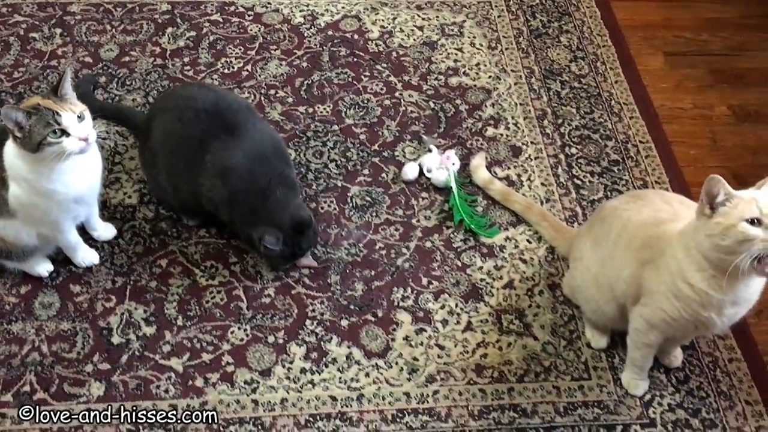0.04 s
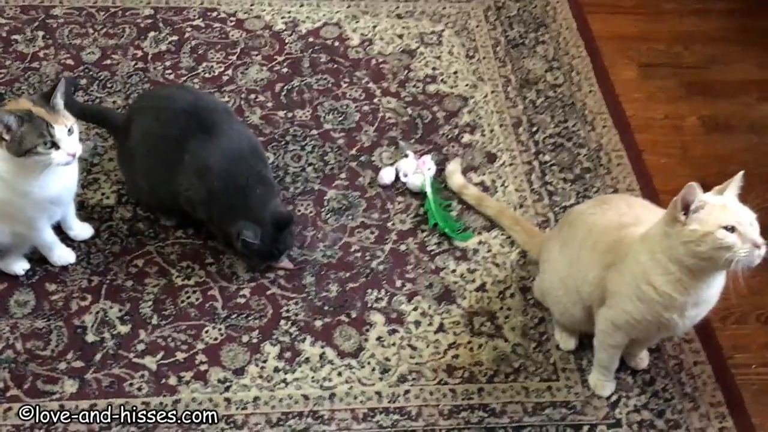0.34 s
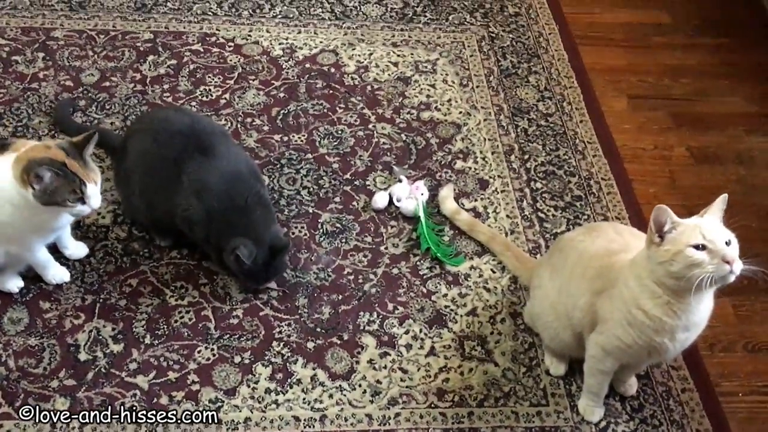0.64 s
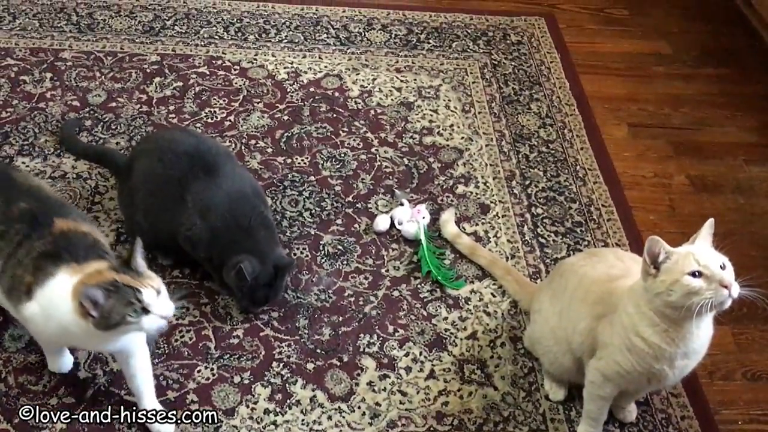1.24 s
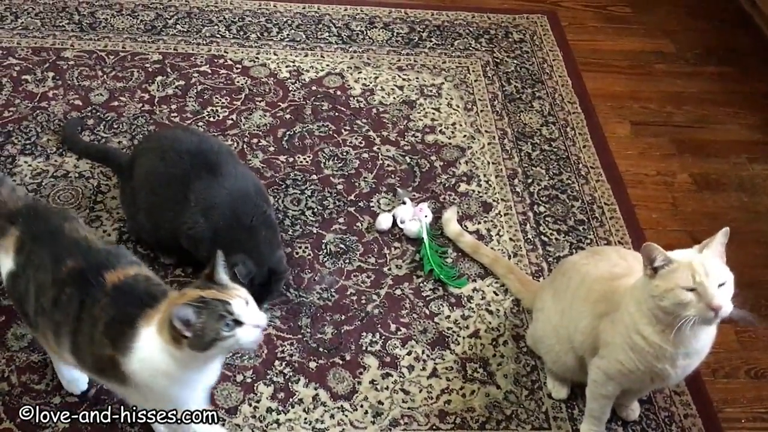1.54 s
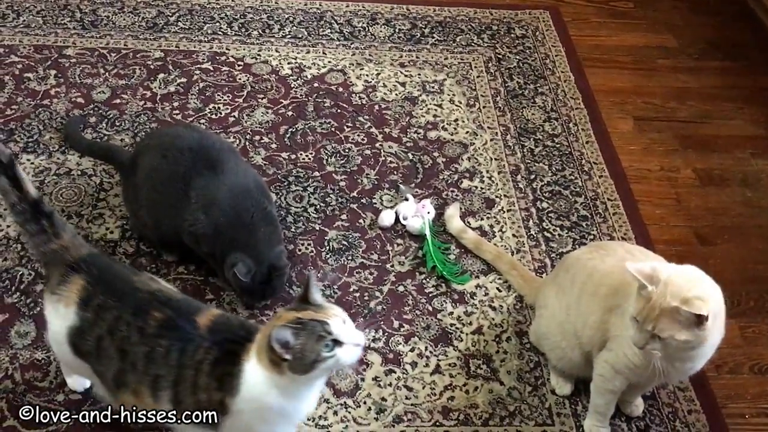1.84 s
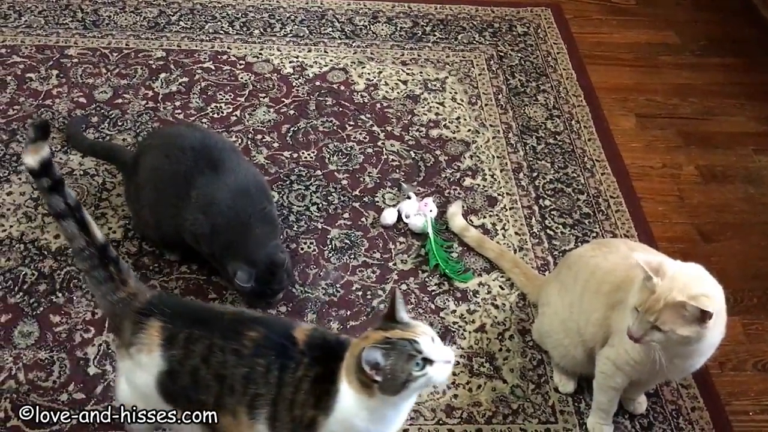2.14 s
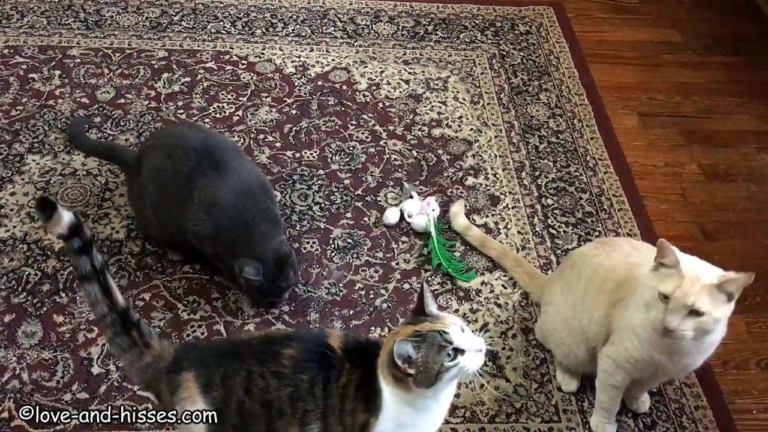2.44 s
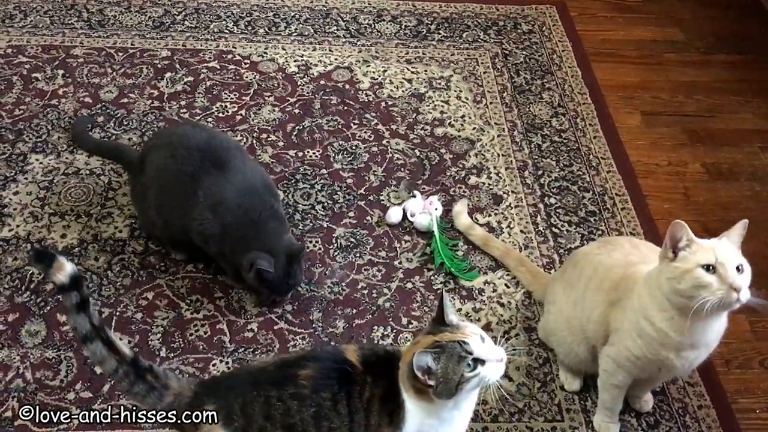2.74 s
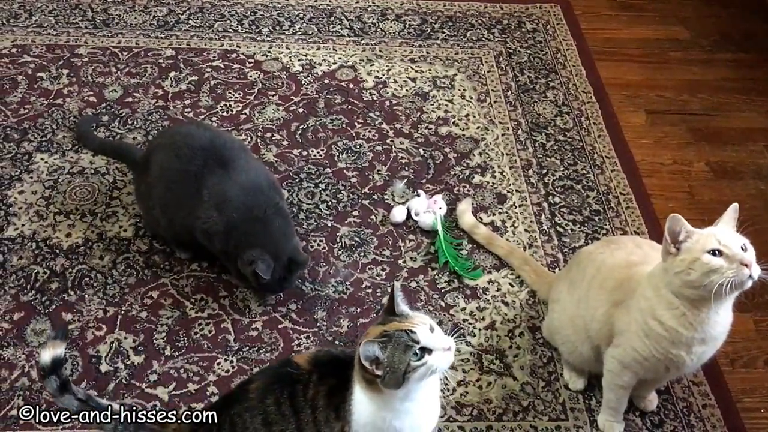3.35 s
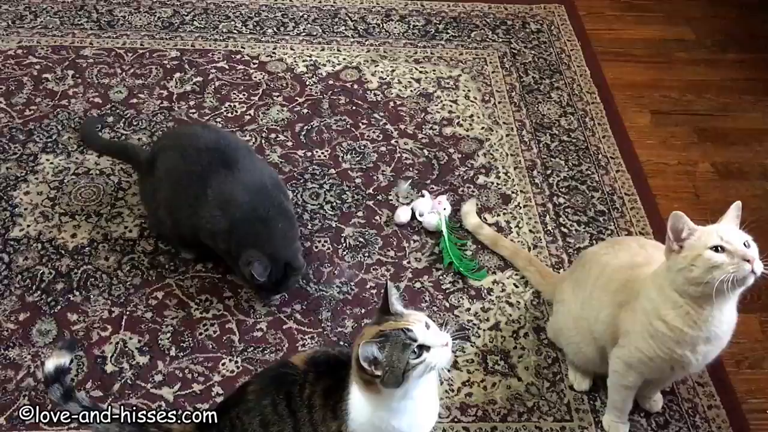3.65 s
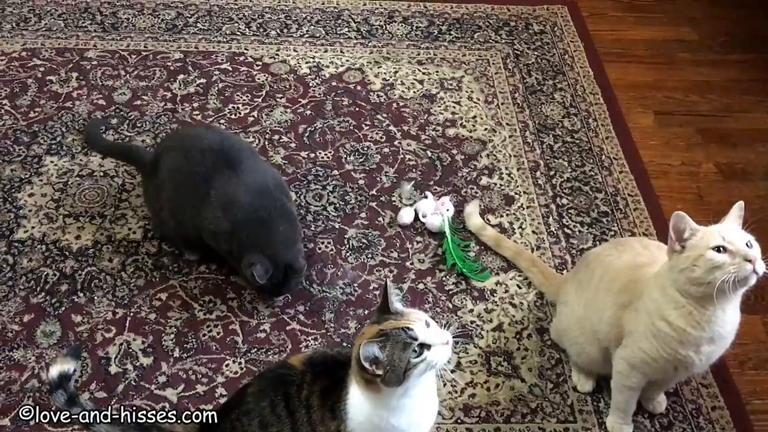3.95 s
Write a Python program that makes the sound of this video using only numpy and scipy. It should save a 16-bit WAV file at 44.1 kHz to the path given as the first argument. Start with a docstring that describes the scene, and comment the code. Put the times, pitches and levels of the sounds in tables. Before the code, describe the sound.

A cat gives two short, thin mews amid soft thumps and clicks in a quiet room.

```python
"""Low rumble, faint hiss and an appliance's hum fill a quiet living room throughout. Soft rustles
come and go, and dull thumps, probably the paws of a cat crossing a rug, ring the floorboards.
Sharp clicks fall on the first two thumps. From 1.4 s the cat gives two short, thin mews, the
overtones of its vocal folds shaped by its closing mouth; a third click cuts into the first mew.
Three dry ticks and two last thumps follow. The walls briefly answer clicks, mews and ticks."""
import sys
import numpy as np
from scipy import signal
from scipy.fft import rfft, irfft, next_fast_len
from scipy.io import wavfile
from scipy.ndimage import map_coordinates

SR = 44100
rng = np.random.default_rng(int(sys.argv[2]) if len(sys.argv) > 2 else 0)


def unload_wav(signal):
    """Save mono or channel-first audio to the path in sys.argv[1] as 16-bit WAV at rate SR, clipped to [-1, 1]."""
    wavfile.write(
        sys.argv[1],
        SR,
        np.round(np.clip(np.atleast_2d(signal).T, -1, 1) * 32767).astype(np.int16),
    )


N = 176400
TIME = np.arange(N) / SR


def amp(db):
    return 10 ** (np.asarray(db) / 20)


def unit(x):
    return x / np.sqrt(np.mean(x ** 2) + 1e-20)


def along(points, hz):
    """Interpolation of (frequency_hz, value) points on a logarithmic frequency axis."""
    f, v = np.transpose(points)
    return np.interp(np.log(hz + 1), np.log(f + 1), v)


def contour(points):
    """Linear interpolation of (time_s, value) points over the scene."""
    return np.interp(TIME, *np.transpose(points))


def wobble(rate_hz):
    """Random modulation: a smooth curve through rate_hz Gaussian knots a second."""
    knots = rng.standard_normal(int(N * rate_hz / SR) + 4)
    return map_coordinates(knots, [np.arange(N) * rate_hz / SR])


def filtered(x, response):
    """Linear filtering: the spectrum is multiplied by a frequency response."""
    size = next_fast_len(len(x) + 8192)
    return irfft(rfft(x, size) * response(np.fft.rfftfreq(size, 1 / SR)), size)[:len(x)]


def octaves(hz, pivot_hz=3900):
    """Octaves above the pivot of a spectral tilt."""
    return np.log2(np.maximum(hz, 100) / pivot_hz)


def noise(colour, tilt_db=0, size=N):
    """Spectral shaping: white noise coloured, tilted by tilt_db an octave and scaled to rms 1."""
    white = rng.standard_normal(size)
    return unit(filtered(white, lambda hz: amp(along(colour, hz) + tilt_db * octaves(hz))))


def ring(modes, t, tilt_db=0):
    """Free vibration: modes struck together decay as damped sinusoids of alternating sign."""
    return sum((-1) ** k * amp(db + tilt_db * octaves(hz) - 60 * t / t60) * np.sin(2 * np.pi * hz * t)
               for k, (hz, db, t60) in enumerate(modes))


def edge(colour, size):
    """A minimum-phase impulse of energy 1: as abrupt an onset as its spectrum allows."""
    magnitude = amp(along(colour, np.fft.rfftfreq(2 * size, 1 / SR)))
    cepstrum = irfft(np.log(magnitude))[:size]
    cepstrum[1:] *= 2  # folding onto positive time makes the pulse causal
    pulse = irfft(np.exp(rfft(cepstrum, 2 * size)))[:size]
    return pulse / np.linalg.norm(pulse)


def add(track, start_s, sound):
    """Superposition of a sound on the track."""
    part = track[max(round(start_s * SR), 0):][:len(sound)]
    part += sound[:len(part)]


def room(x, wet_db, build_s=0.0027):
    """Convolution with the room's response: direct sound, two early reflections, a diffuse tail."""
    decay_times = [(200, 0.15), (2000, 0.41), (5000, 0.22), (9000, 0.37), (15000, 0.075)]  # reverberation: frequency_hz, t60_s
    reflections = [(.0096, -14.5), (.0112, -16)]  # near echoes: delay_s, gain_db
    hz, t, spectra = signal.stft(rng.standard_normal(SR // 2), SR, nperseg=256)
    decay = amp(-60 * t / along(decay_times, hz)[:, None])
    tail = signal.istft(spectra * decay, SR, nperseg=256)[1]
    tail *= 1 - np.exp(-np.arange(len(tail)) / SR / build_s)
    response = amp(wet_db) * tail / np.linalg.norm(tail)
    response[0] += 1
    for delay_s, db in reflections:
        response[round(delay_s * SR)] += amp(db)
    return signal.fftconvolve(x, response)


def appliance_hum(waver_db=1.05, drift_rad=0.29):
    """A line spectrum: each of the appliance's tones wavers slowly in amplitude and phase."""
    tones = [(75.2, -56.5), (119.8, -54.5), (161.8, -65), (298.6, -67), (742, -95), (1118, -78.5)]  # spectral lines: frequency_hz, level_db
    swell = [(0, -.5), (.7, 2), (1.05, -4.5), (1.35, -1), (1.57, 2), (1.75, -1.5), (2.05, 1), (3.3, -.5),
             (3.8, 2)]  # wavering common to all lines: time_s, gain_db
    hum = np.zeros(N)
    for hz, db in tones:
        peak = np.sqrt(2) * amp(db + waver_db * wobble(4.915))
        hum += peak * np.sin(2 * np.pi * (hz * TIME + rng.random()) + drift_rad * wobble(3.99))
    return amp(contour(swell)) * hum


def hiss(level_db=-74):
    """Broadband noise, faint and nearly steady."""
    spectrum = [(500, 4.5), (2000, 4), (4000, 2.5), (5000, -1), (6200, 3.5), (8000, -1), (9500, 0.5),
                (10500, -5), (12000, -1), (15500, -5.5)]  # colour of the hiss: frequency_hz, gain_db
    swell = [(0, 2), (1, -1), (2.5, -1), (4, -1.3)]  # slow change of level: time_s, gain_db
    return amp(level_db + contour(swell)) * noise(spectrum)


def rumble(level_db=-52, waver_db=0.57):
    """Low-frequency room noise under slight amplitude modulation."""
    spectrum = [(15, -44), (25, -22.5), (39, -11), (58, 0), (80, -5), (95, -6.5), (135, -6), (170, -8.5),
                (215, -10), (320, -10), (430, -18), (680, -20.5), (800, -25), (1150, -27), (1450, -31),
                (1800, -38), (3000, -46.5), (6000, -49.5), (16000, -91)]  # colour of the rumble: frequency_hz, gain_db
    swell = [(0, 0), (.65, 0.7), (1.05, -0.25), (1.6, -1), (2.05, 0.5), (2.7, -0.3), (3.4, -0.15),
             (3.9, -0.3)]  # slow change of level: time_s, gain_db
    return amp(level_db + contour(swell) + waver_db * wobble(3.3)) * noise(spectrum)


def rustles():
    """Soft brushes: noise under envelopes of exponential growth and decay."""
    brushes = [(.012, -60.5, 0.053, 0.043, 1.5), (.548, -70, .004, 0.0094, 5), (.685, -69.5, .018, .025, 6),
               (.735, -69, 0.017, 0.022, 7), (.84, -53.5, 0.014, .012, -23), (1.302, -74, .008, .015, 9),
               (1.327, -65.5, .008, 0.021, 9), (1.812, -63, .003, 0.016, 7.5),
               (1.853, -67, 0.0043, 0.015, -3), (3.18, -72.5, 0.071, .08, -10)]  # each rustle: peak_s, level_db, rise_s, fall_s, tilt_db_per_octave
    spectrum = [(300, -70), (1200, -0.5), (2000, 1.5), (3800, -8.5), (5000, -11.5), (7000, -15),
                (10000, -29), (16000, -46)]  # colour before the tilt: frequency_hz, gain_db
    track = np.zeros(N)
    for peak_s, db, rise_s, fall_s, tilt_db in brushes:
        envelope = np.exp(-np.maximum((peak_s - TIME) / rise_s, (TIME - peak_s) / fall_s))
        track += amp(db) * envelope * noise(spectrum, tilt_db)
    return track


def thumps(rise_s=0.0054, thud_db=-1, thud_t60_s=0.15):
    """Cushioned impact: a padded push sets in gradually and rings the wooden floor's low modes."""
    pushes = [(0.365, -52), (0.852, -52), (1.122, -47.5), (1.942, -47), (2.271, -53)]  # probably paws: start_s, level_db
    board_modes = [(188.6, 6, .11), (243, -1, 0.077)]  # floorboards: frequency_hz, gain_db, t60_s
    spectrum = [(60, -31), (140, -25.5), (190, -0.5), (250, -6.5), (330, -6), (450, -32), (700, -20),
                (1200, -26.5), (3000, -56)]  # colour of the thud: frequency_hz, gain_db
    track, t = np.zeros(N), np.arange(SR // 4) / SR
    onset = 1 - np.exp(-t / rise_s)
    for start_s, db in pushes:
        thud = amp(thud_db - 60 * t / thud_t60_s) * noise(spectrum, size=len(t))
        add(track, start_s, amp(db) * onset * (ring(board_modes, t) + thud))
    return track


def clicks(grit_db=-14, thud_db=-0.5, noise_t60_s=0.013, knock_delay_s=0.001456):
    """Impulsive excitation: a sharp crack and a snap of damped modes, then at once a duller knock."""
    strikes = [(.3659, -33.5, -2.5, -50, -44), (0.8512, -32.5, 0, -41.5, -45),
               (1.4869, -54, 13, -28.5, -44)]  # each click: start_s, snap_db, tilt_db_per_octave, crack_db, knock_db
    snap_modes = [(1816, -10, 0.0047), (2480, -13.5, 0.006), (3500, -2.5, 0.0043), (4420, -5, 0.0026),
                  (6270, -15.5, 0.0057), (8350, -11, 0.0023)]  # ring of the clicking thing: frequency_hz, gain_db, t60_s
    body_modes = [(720, 1.5, 0.013), (1210, -2, 0.014), (1600, -5.5, 0.013), (2284, -4, 0.017)]  # body under the click: frequency_hz, gain_db, t60_s
    crack_colour = [(1000, -8), (3500, -12), (6000, 7), (8500, 5), (10500, 0), (12000, 4), (14000, 3),
                    (16000, 6)]  # sharp edge and its grit: frequency_hz, gain_db
    knock_colour = [(200, -19), (450, -4), (700, 0), (1200, -3), (1700, -7), (2700, -4), (3800, 0),
                    (4600, -6), (5400, -10), (7000, -7), (10000, -28), (16000, -36)]  # thud of the knock: frequency_hz, gain_db
    track, t = np.zeros(N), np.arange(SR // 16) / SR
    decay = amp(-60 * t / noise_t60_s)
    for start_s, snap_db, tilt_db, crack_db, knock_db in strikes:
        crack = edge(crack_colour, len(t)) + amp(grit_db) * decay * noise(crack_colour, size=len(t))
        knock = ring(body_modes, t) + amp(thud_db) * decay * noise(knock_colour, size=len(t))
        click = amp(snap_db) * ring(snap_modes, t, tilt_db) + amp(crack_db) * crack
        add(click, knock_delay_s, amp(knock_db) * knock)
        add(track, start_s, room(click, wet_db=-6))
    return track


def mew(gesture, throat, jitter=0.0033, shimmer_db=3, rough_depth=0.24, rough_hz=167.6):
    """Source and filter: the resonances of a closing mouth weight twelve vocal-fold harmonics."""
    rasp_colour = [(500, -7), (1300, -4), (1650, -7), (1900, 5), (2200, -7), (2450, -18), (2900, 3),
                   (3800, -19), (5200, -7), (6500, -12), (8000, -30), (12000, -30)]  # noise in the voice: frequency_hz, gain_db
    times, *columns = np.transpose(gesture)
    hz, db, closing, rasp_db = [np.interp(TIME, times, column) for column in columns]
    pitch = hz * (1 + jitter * wobble(330))
    phase = 2 * np.pi * np.cumsum(pitch) / SR
    wide, narrow = np.array(throat)[:, :2], np.array(throat)[:, ::2]
    tone, power = np.zeros(N), np.zeros(N)
    for k in range(1, 13):
        mouth_db = (1 - closing) * along(wide, k * hz) + closing * along(narrow, k * hz)
        gain = amp(mouth_db + shimmer_db * wobble(90))
        tone += gain * np.sin(k * phase)
        power += gain ** 2 / 2
    rasp = unit(noise(rasp_colour) * (1 + np.cos(phase) / 2))  # pulses once a cycle
    roughness = 1 + rough_depth * wobble(rough_hz)  # uneven beating of the folds
    voice = roughness * tone / np.sqrt(power) + amp(rasp_db) * rasp
    sounding = (TIME > times[0]) & (TIME < times[-1])
    return room(amp(db) * sounding * voice, wet_db=-11)[:N]


def cat():
    """Phonation in two short mews: in each the pitch arches and the mouth ends nearly closed."""
    # vocal gestures: time_s, pitch_hz, level_db, closing_fraction, rasp_db
    first_gesture = [(1.424, 720, -78, 0, -3), (1.432, 737, -54, 0.4, -8), (1.442, 741, -50.5, 0.15, -19),
                     (1.456, 750, -55, 0.2, -27), (1.469, 750, -56.5, 0, -15), (1.495, 737, -51, 0.3, -13),
                     (1.526, 725.3, -51.5, 1, -13), (1.548, 716, -62, 1, -4), (1.562, 700, -78, 1, -5)]
    second_gesture = [(1.674, 704, -72, 0.18, 1), (1.683, 708, -60, 0, -4), (1.706, 728, -58, 0, -6),
                      (1.732, 721.4, -59, 0.049, -13), (1.757, 706, -62, 0.64, -16),
                      (1.77, 692.5, -61.5, 1, -10), (1.787, 704, -62, 1, -10), (1.8, 658, -61.5, 1, -13),
                      (1.815, 668, -73, 1, -4)]
    # response of throat and mouth: frequency_hz, open_db, nearly_closed_db
    first_throat = [(730, -5, -9.5), (1480, -13, -10.5), (2180, -1, 2), (2970, -15, -27), (3700, -25, -15),
                    (4450, -12, -22), (5230, -13.5, -21), (5950, -19, -21), (6800, -32, -34),
                    (10000, -41, -44)]
    second_throat = [(720, -1.5, -14), (1440, -7, -1.5), (2150, 1, 3.5), (2850, -1, -5), (3550, -7, -26),
                     (4300, -10, -18), (5000, -8, -21), (5700, -9, -9), (6300, -14, -14), (7200, -24, -30),
                     (10000, -34, -38)]
    return mew(first_gesture, first_throat) + mew(second_gesture, second_throat)


def ticks():
    """Contact transients without a resonant body: a bright impulse, then a brief scrape."""
    contacts = [(1.8104, -56, -66, .025, 1), (2.2813, -58, -57.5, 0.042, -4.5),
                (2.5387, -34, -54.5, 0.017, -8)]  # each tick: start_s, edge_db, scrape_db, scrape_t60_s, wet_db
    edge_colour = [(1000, -6), (3000, -17), (4300, 3), (6000, -5), (8000, -7), (9700, -1), (11000, -6),
                   (13500, 5), (16000, 1)]  # first contact: frequency_hz, gain_db
    scrape_colour = [(1000, -9), (2000, 4), (2700, -7), (3600, 4), (4500, -9), (6000, -2), (7000, -7),
                     (8000, -3), (10000, -6), (12200, 1), (13700, -6), (16000, -7)]  # scrape after it: frequency_hz, gain_db
    track, t = np.zeros(N), np.arange(SR // 16) / SR
    for start_s, edge_db, scrape_db, t60_s, wet_db in contacts:
        impulse = amp(edge_db) * edge(edge_colour, len(t))
        scrape = amp(scrape_db - 60 * t / t60_s) * noise(scrape_colour, size=len(t))
        add(track, start_s, room(impulse + scrape, wet_db))
    return track


def scene():
    """Superposition of all sources at one point in the room."""
    background = appliance_hum() + hiss() + rumble()
    return (background + cat() + clicks() + ticks() + thumps() + rustles())[None]


def record(dry):
    """Band limiting: an ideal low-pass filter removes the highest treble."""
    cutoff_hz = 15950
    return filtered(dry[0], lambda hz: hz < cutoff_hz)[None]


dry = scene()
out = record(dry)
unload_wav(out)
```